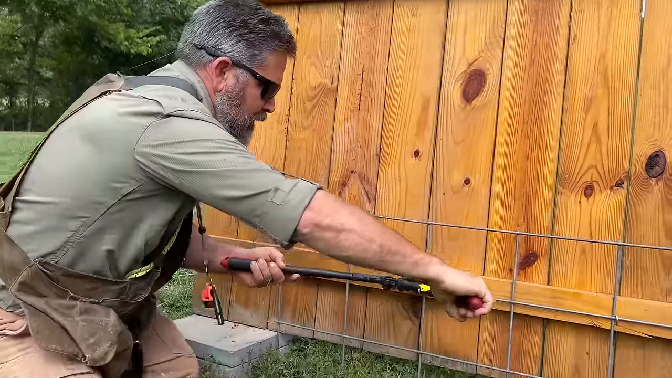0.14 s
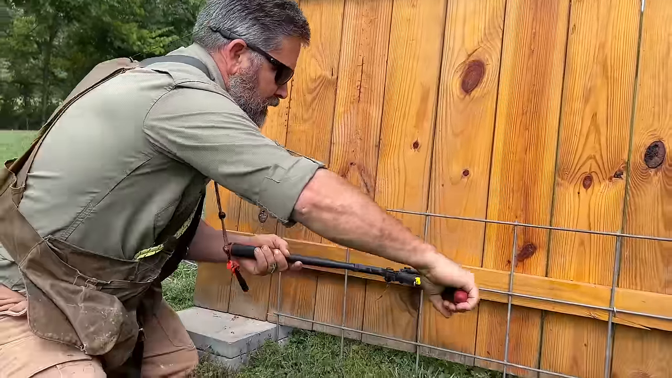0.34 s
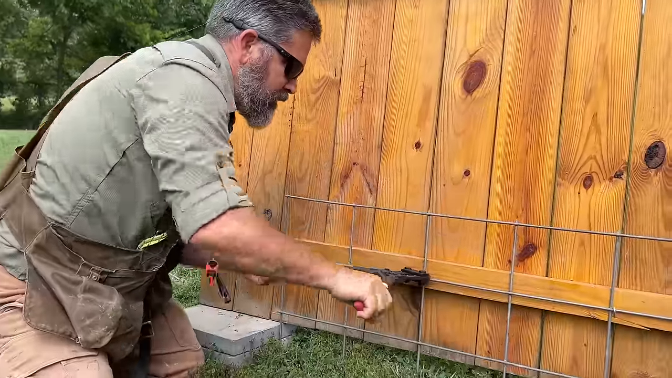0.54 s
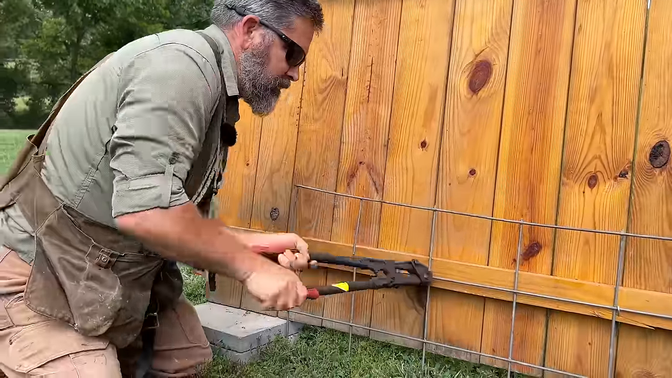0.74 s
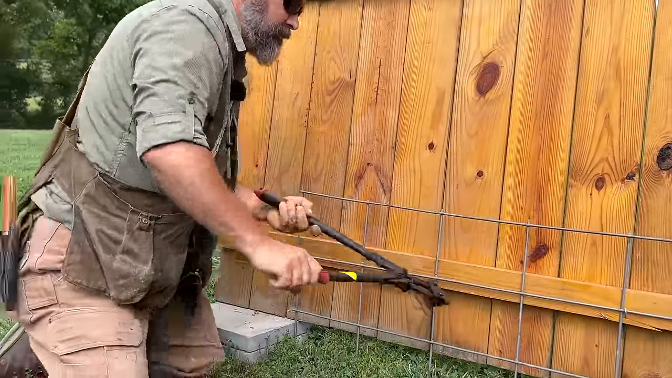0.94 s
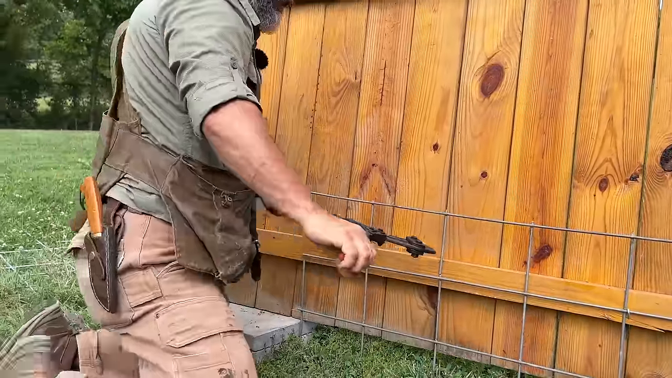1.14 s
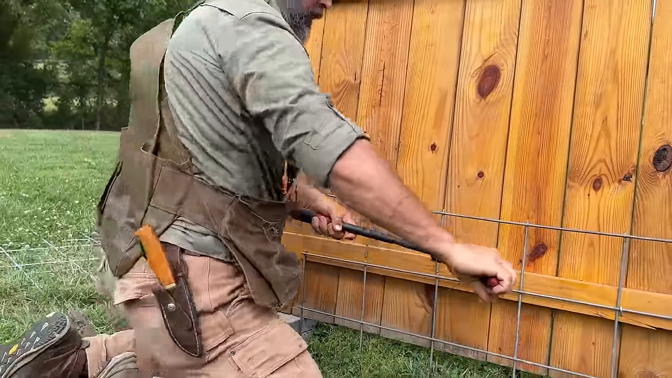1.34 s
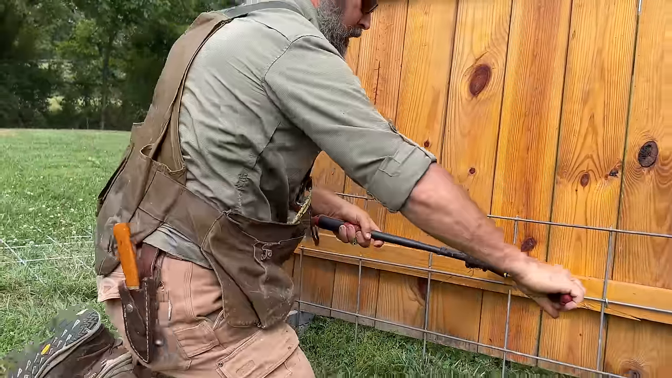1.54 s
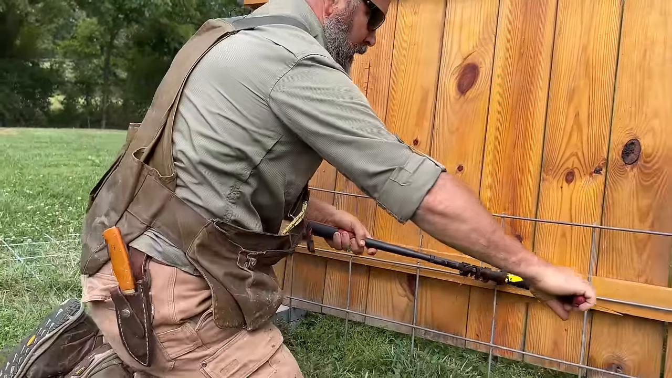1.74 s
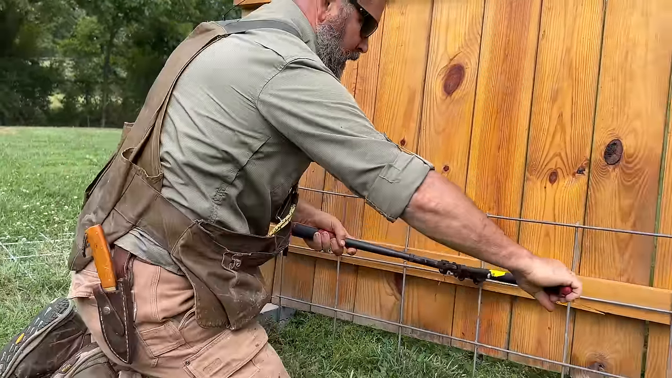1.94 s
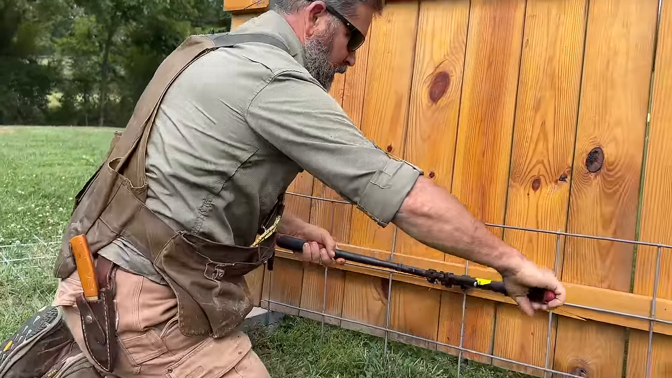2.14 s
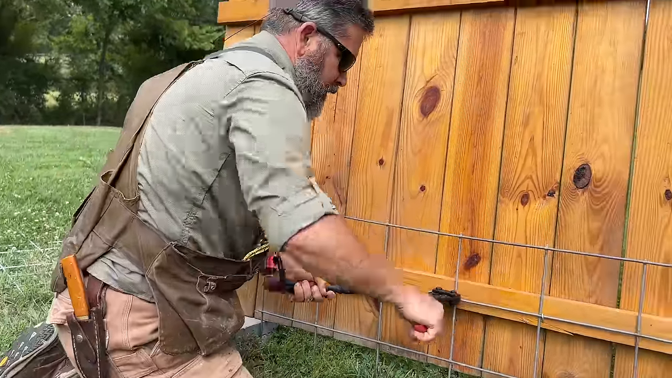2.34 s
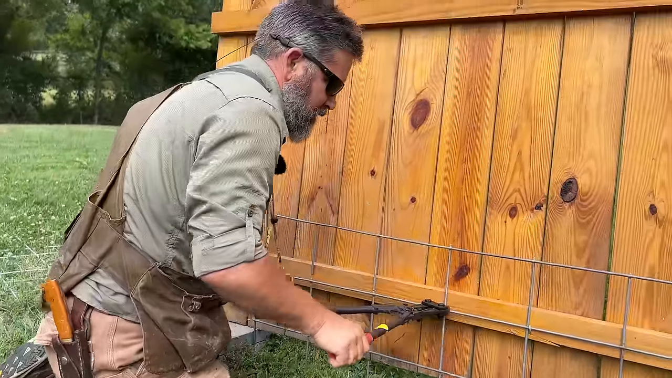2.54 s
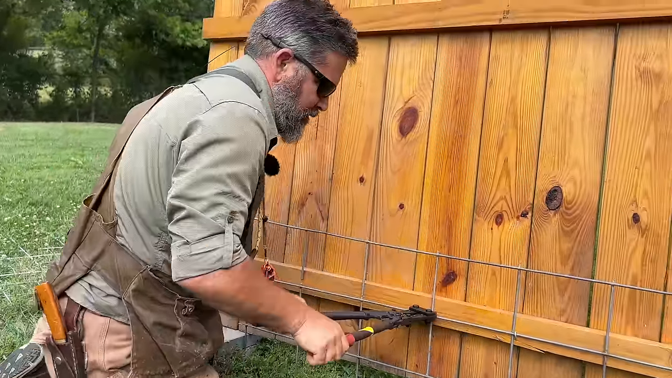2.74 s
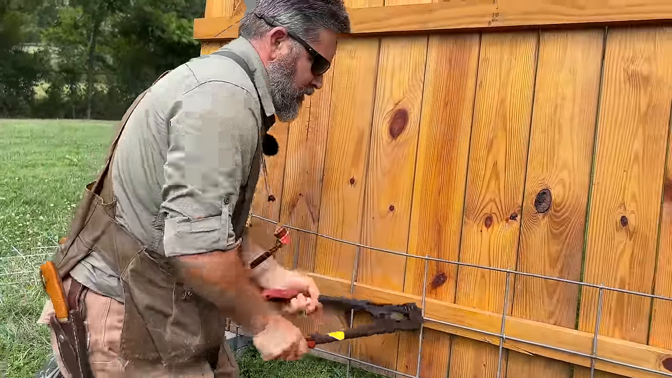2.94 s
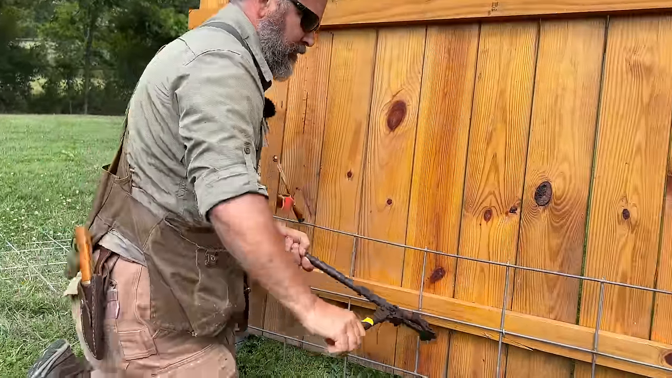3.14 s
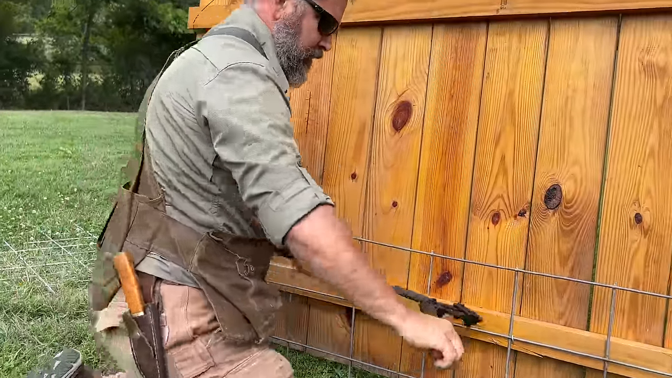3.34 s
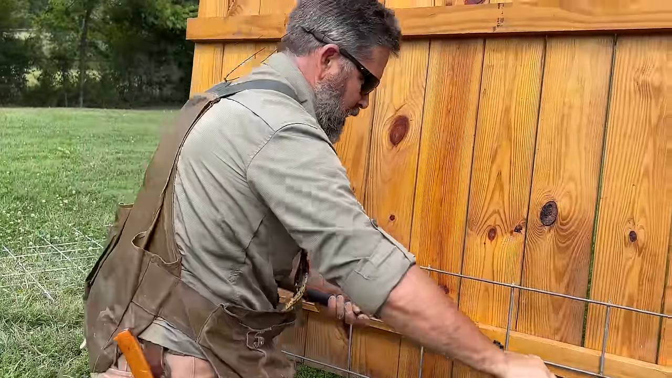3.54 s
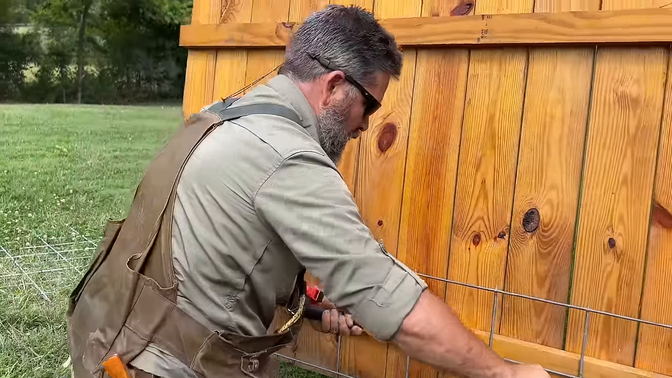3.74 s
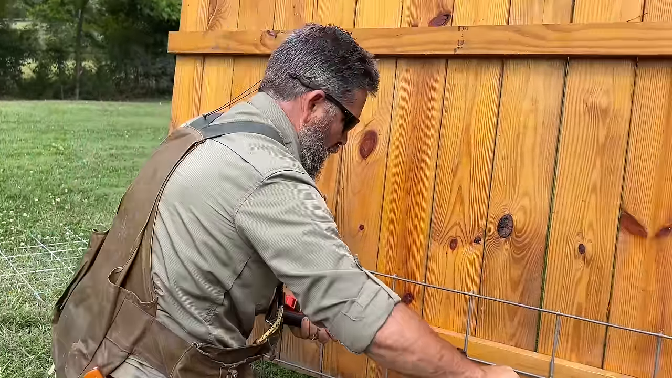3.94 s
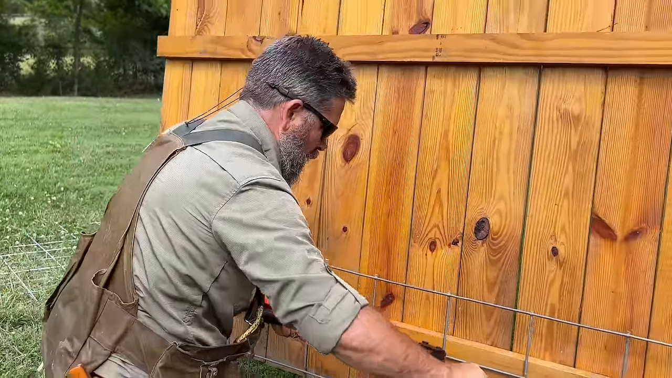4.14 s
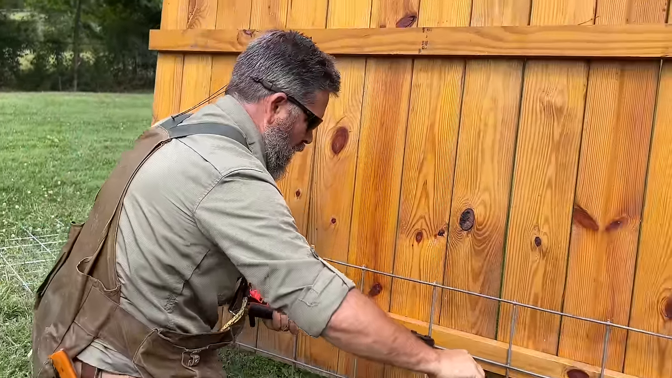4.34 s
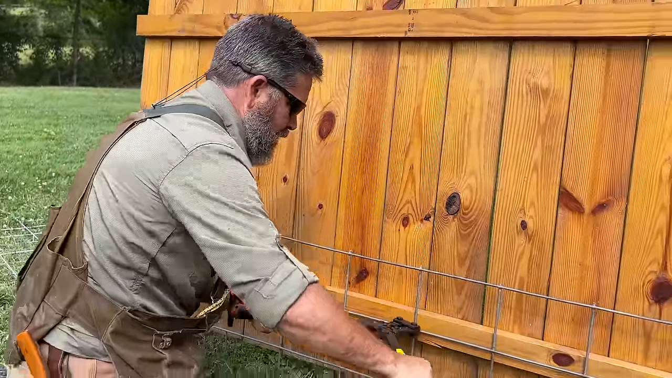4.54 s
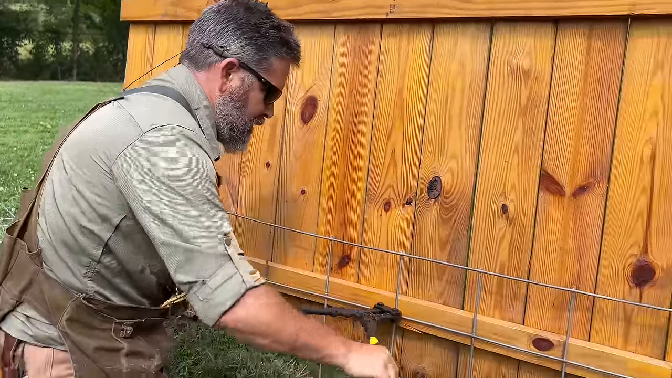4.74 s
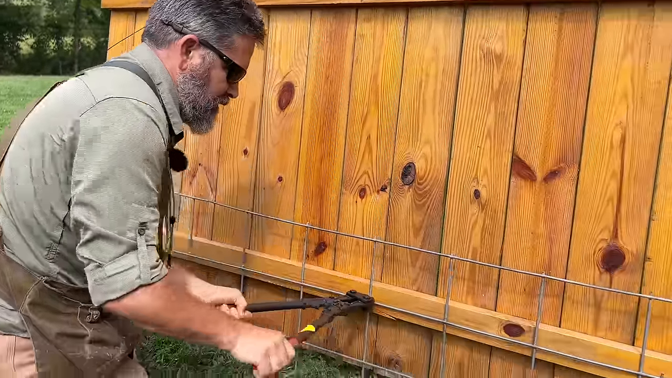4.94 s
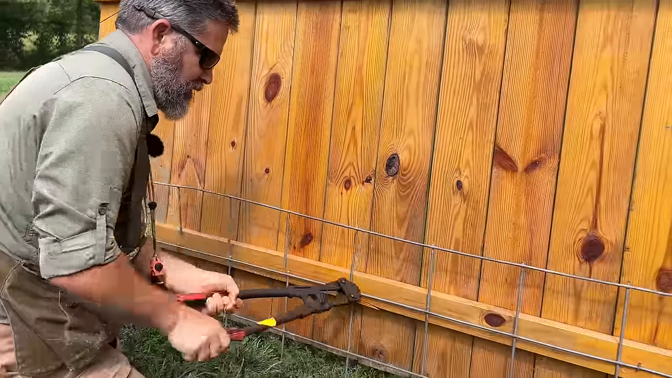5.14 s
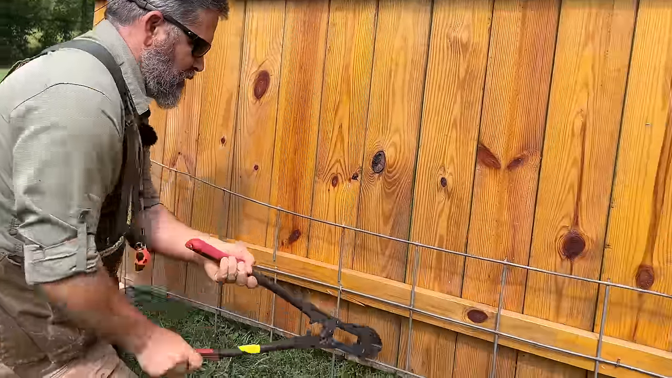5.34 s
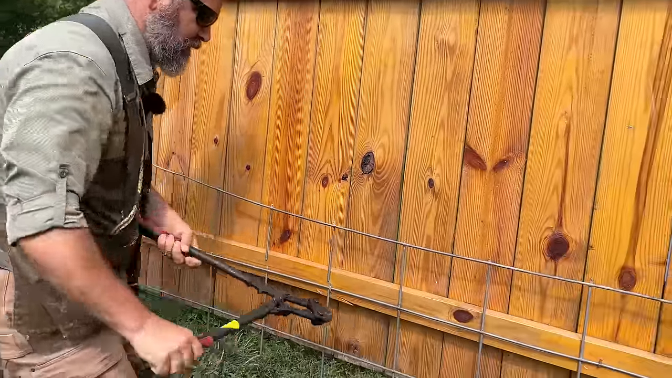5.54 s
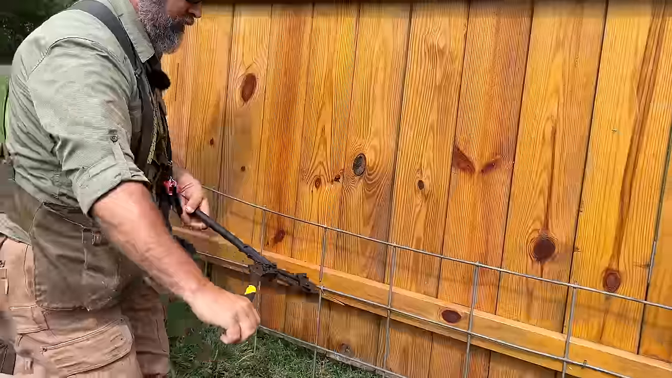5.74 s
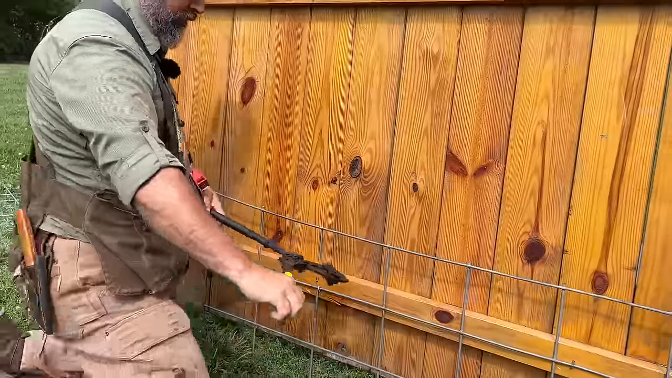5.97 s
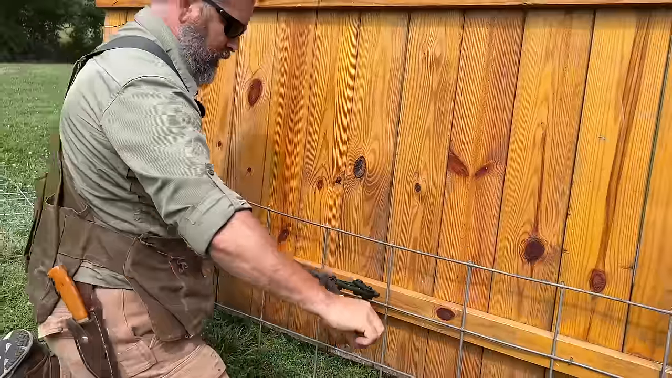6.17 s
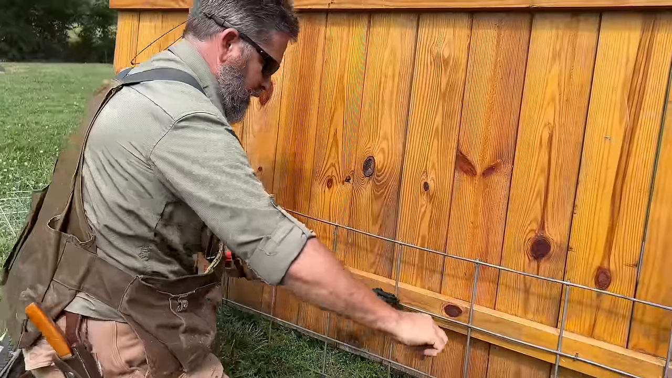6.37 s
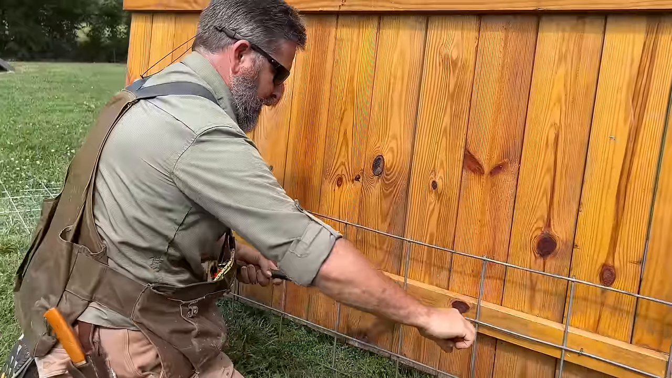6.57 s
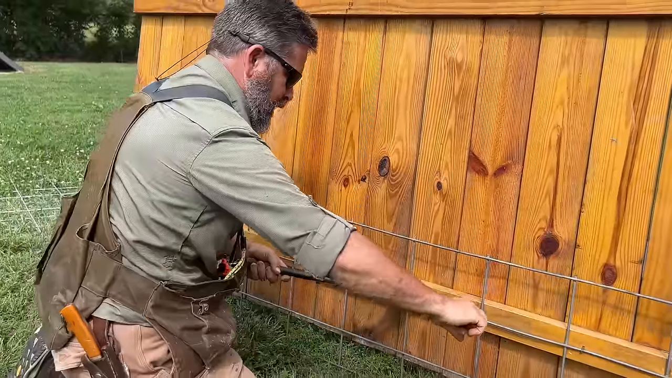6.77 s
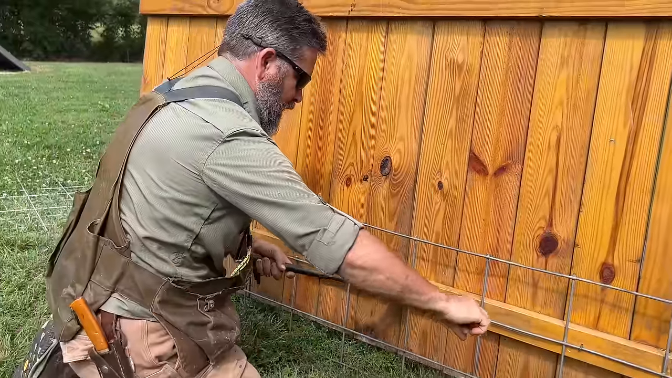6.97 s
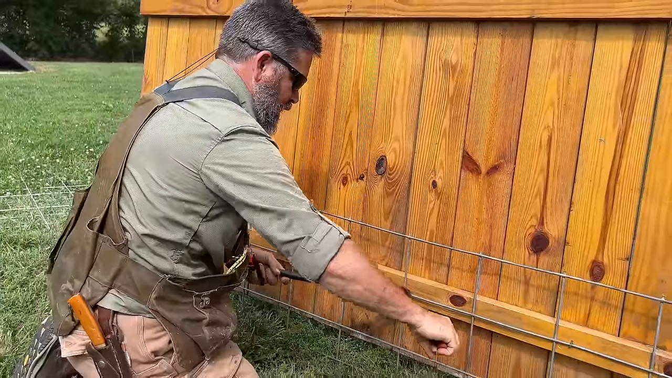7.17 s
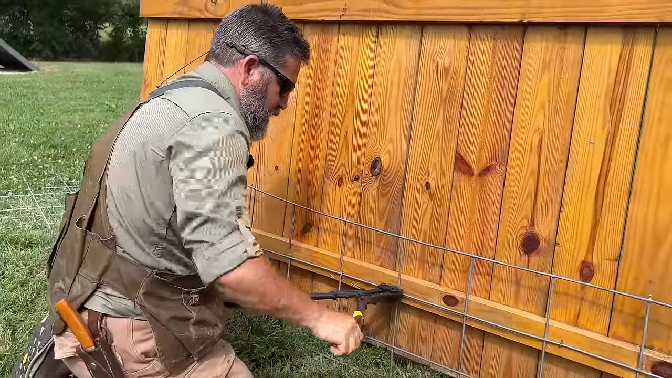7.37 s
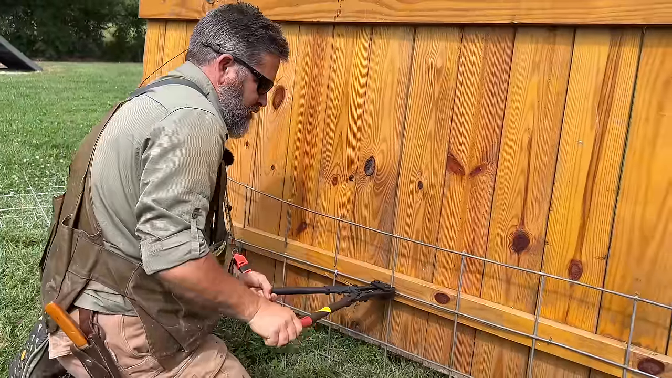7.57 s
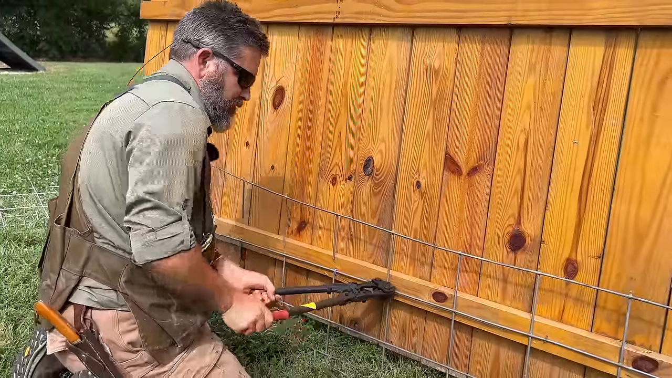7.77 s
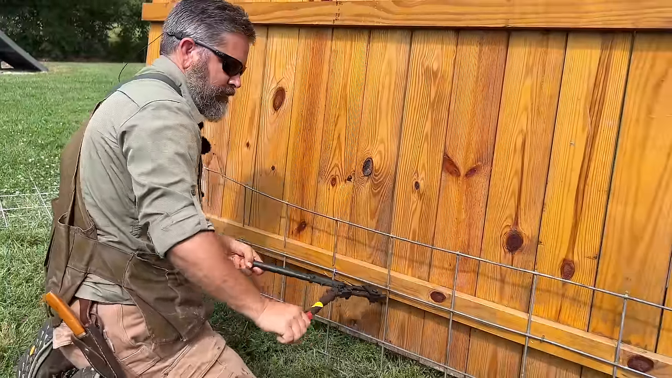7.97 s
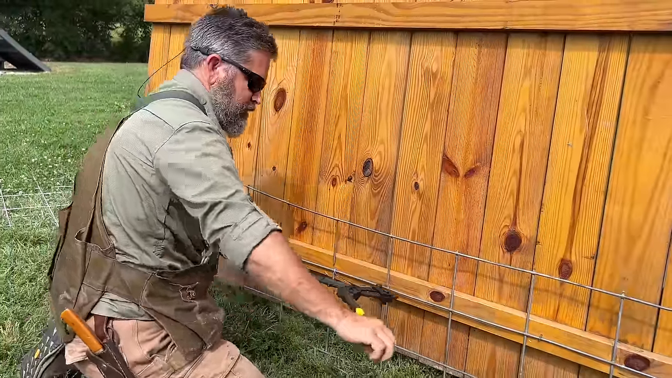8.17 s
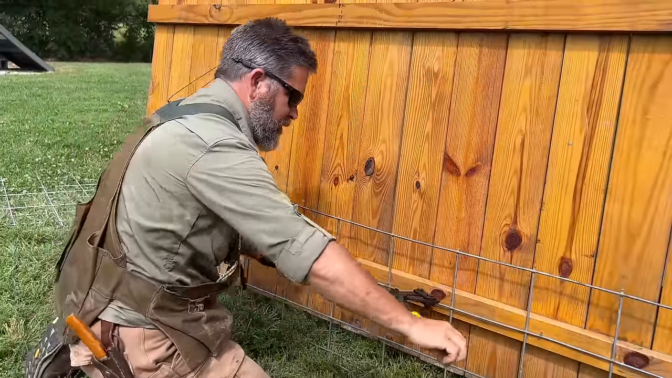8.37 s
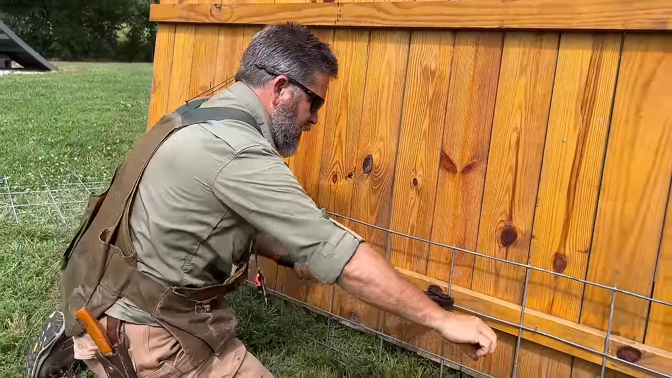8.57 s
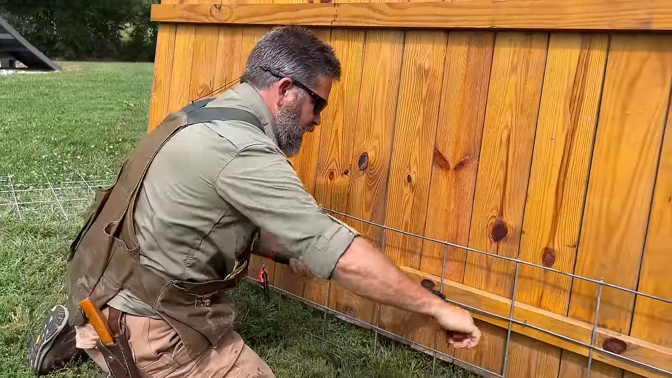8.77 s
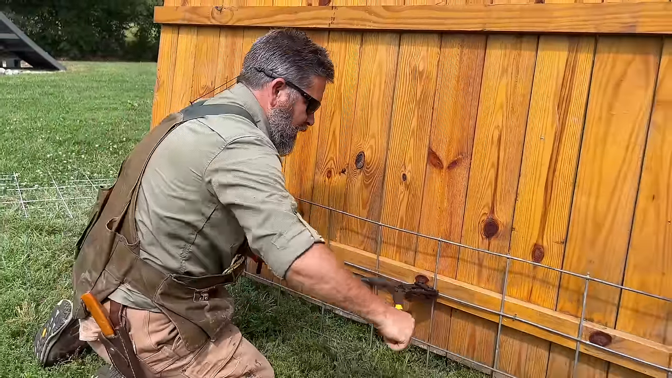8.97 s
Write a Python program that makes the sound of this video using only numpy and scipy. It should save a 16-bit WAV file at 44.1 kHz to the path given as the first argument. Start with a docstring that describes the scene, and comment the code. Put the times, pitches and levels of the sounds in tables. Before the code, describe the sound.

Four hard metallic snaps crack through a board fence, separated by light wire rattles and low bumps over faint engine hum and insects.

```python
"""Steel rattles against a board fence while a far engine hums and insects hiss over the field.
Bolt cutters then snap four wires of the leaning mesh panel, heard by a microphone on the chest.
Snaps and contacts are dying noise through boards, jaws and wire; a buzz of varying level joins them.
The steel rings as dying sines, a freed length of wire drops and rings, and low thumps bump the chest.
Peaks beyond full scale are clipped."""
import sys
import numpy as np
from scipy import signal
from scipy.io import wavfile
from scipy.ndimage import uniform_filter1d

SR = 44100
rng = np.random.default_rng(int(sys.argv[2]) if len(sys.argv) > 2 else 0)


def unload_audio(sound):
    """Save the sound as a 16-bit wav file, at the path given as the first command line argument."""
    columns = np.transpose(np.atleast_2d(sound))
    # keep every value between -1 and 1, then stretch to whole-number steps
    steps = np.round(np.clip(columns, -1, 1) * 32767)
    wavfile.write(sys.argv[1], SR, steps.astype(np.int16))


N = 397341

# The far engine's path. Each row: time in seconds, firing rate in Hz, level in dB.
ENGINE_HUM = [(0, 80.6, -55.5), (.6, 78, -56), (1.8, 75.7, -63.5), (3.3, 78.3, -59), (5.0, 78.5, -70.5),
              (6.2, 80.64, -67.5), (8.2, 73.95, -66.5), (9.01, 74.5, -63.5)]
# Modes of the cutters. Each row: frequency in Hz, relative level in dB, free t60 in seconds.
STEEL_MODES = [(2358, -6, .12), (2912, -5, .15), (3050, -6, .13), (3375, -6, .22), (3731, -2, .12),
               (3880, -5, .11), (4409, -10, .12), (5243, -12, .2), (5540, -5, .18), (6492, -4, .22),
               (7221, -6, .12), (7725, -10, .16), (8040, -7, .13), (9230, -10, .22), (10510, -9, .25),
               (11430, -12, .1), (12580, -8, .2)]
# The jaws bite through a wire. Each row: start in seconds, boards peak in dB, jaws in dB, wire in dB,
# knock in Hz, clear ring of the steel in dB, how long it rings as a share of each mode's t60.
WIRE_SNAPS = [(0.655, -3, -5.5, -7, 3300, -33, .8), (2.775, 2, -3.5, -4.5, 3860, -31, .8),
              (5.115, -1, -7, -6, 2750, -30, .9), (7.646, 1, -5.5, -4.5, 3270, -25, 1.7)]


def amp(db):
    """Turns dB into a linear gain."""
    return 10 ** (np.asarray(db) / 20)


def evened(x):
    """Scales to rms 1."""
    return x / np.sqrt(np.mean(x ** 2) + 1e-20)


def unit(x):
    """Scales a response to energy 1."""
    return x / np.linalg.norm(x)


def read(points, hz):
    """Reads a spectrum on a log-frequency axis."""
    f, value = np.transpose(points)
    return np.interp(np.log(hz + 1), np.log(f + 1), value)


def follow(rows):
    """Joins curve rows into one value a sample for each column."""
    s, *columns = np.transpose(rows)
    return [np.interp(np.arange(N) / SR, s, c) for c in columns]


def add(mix, s, sound):
    """Mixes a sound in at time s, cut off at the end of the mix."""
    part = mix[..., round(s * SR):][..., :sound.shape[-1]]
    part += sound[..., :part.shape[-1]]


def colour(points, size=4096):
    """Causal minimum-phase response with the given spectrum, at energy 1."""
    level_db = read(points, abs(np.fft.fftfreq(size, 1 / SR)))
    log_gain = np.log(amp(np.maximum(level_db, -100)))
    spectrum = np.exp(np.conj(signal.hilbert(log_gain)))  # the phase follows from the gain
    return unit(np.fft.ifft(spectrum).real[:size // 2])


def ring(modes, db=0, stretch=1):
    """Sum of dying sines, as a struck body rings in its modes."""
    t = np.arange(SR // 3) / SR
    hz, mode_db, t60 = np.transpose(modes)[:, :, None]
    decay = amp(mode_db + db - 60 * t / (t60 * stretch))
    return (decay * np.sin(2 * np.pi * hz * t)).sum(0)


def gritty(size, spread_db):
    """Noise of many tiny impacts of uneven strength."""
    uneven = evened(uniform_filter1d(rng.standard_normal(size), size=40))
    return evened(rng.standard_normal(size) * amp(spread_db * uneven))


def engine():
    """A far engine: its wavering firing tone and the octave."""
    octave_db = -7.5
    hz, db = follow(ENGINE_HUM)
    waver = evened(uniform_filter1d(rng.standard_normal((2, N)), size=4000))
    turn = 2 * np.pi * np.cumsum(hz + 3.2 * waver[0]) / SR
    level = np.sqrt(2) * amp(db + 1.2 * waver[1])
    return level * (np.sin(turn) + amp(octave_db) * np.sin(2 * turn))


def field():
    """Soft outdoor air and insects: shaped noise whose spectrum drifts in patches."""
    # Spectrum of the air. Each row: frequency in Hz, relative density in dB per Hz.
    air_spectrum = [(12, -50.5), (20, -20.5), (81, -3.5), (271, -13.5), (391, -16.5), (906, -23.5),
                    (1680, -34.5), (3480, -35), (4740, -32.5), (7850, -31), (14600, -45.5), (16300, -63)]
    field_db = -59
    field_follows = 0.61  # the air quiets with the engine, dB per dB
    insect_hz, width_hz, insect_db = 7750, 450, 4  # the insects are a bump in the spectrum

    frames, hz = N // 256 + 5, np.fft.rfftfreq(1024, 1 / SR)
    real, imaginary, patches = rng.standard_normal((frames, 513, 3)).T
    patches = uniform_filter1d(patches, size=12, axis=0)  # across frequency
    patches = evened(uniform_filter1d(patches, size=14, axis=1))  # across time
    insect_bump_db = insect_db * np.exp(-((hz - insect_hz) / width_hz) ** 2)
    level_db = read(air_spectrum, hz) + insect_bump_db
    z = (real + 1j * imaginary) * amp(level_db[:, None] + 0.61 * patches)
    air = evened(signal.istft(z, nperseg=1024, noverlap=768)[1][:N])
    hum_db = follow(ENGINE_HUM)[1]
    return amp(field_db + field_follows * (hum_db - hum_db.mean())) * air


def thumps():
    """Handles and arms bump the chest near the microphone: a low tone whose pitch drops at once."""
    # Bumps on the chest. Each row: start in seconds, peak in dB.
    chest_bumps = [(0.072, -19.5), (0.115, -29), (0.169, -34.5), (0.655, -22.5), (0.739, -31),
                   (1.971, -17.5), (2.005, -30.5), (2.235, -33), (2.311, -25.5), (2.787, -27.5),
                   (3.014, -34.5), (3.12, -45), (3.453, -31.5), (3.684, -35), (4.185, -27), (4.508, -38.5),
                   (5.115, -13.5), (5.164, -26), (6.94, -27), (7.258, -36.5), (7.478, -45), (7.646, -19.5),
                   (7.821, -33), (8.568, -23), (8.67, -33), (8.986, -38.5)]
    out, t = np.zeros(N), np.arange(SR // 8) / SR
    turn = 2 * np.pi * 135 * t * (1 + .9 * np.exp(-t / 0.0078))
    thump = amp(-60 * t / 0.05) * np.sin(turn)
    for s, db in chest_bumps:
        add(out, s, amp(db) * thump / abs(thump).max())
    return out


def offcut():
    """The freed length of wire drops; each bounce rings its modes in another balance."""
    # Modes of the loose wire. Each row: frequency in Hz, relative level in dB, t60 in seconds.
    loose_modes = [(5660, -4, .2), (6400, -4, .15), (8960, 0, .28), (9350, -2, .28), (10900, -2, .15),
                   (12600, -8, .25), (15160, -14, .18)]
    # Its bounces. Each row: start in seconds, level in dB.
    bounces = [(5.243, -34), (5.304, -42), (5.524, -65)]
    out = np.zeros(N)
    spots_db = 2.9 * rng.standard_normal((len(bounces), len(loose_modes), 1))
    for (s, db), spot_db in zip(bounces, spots_db):
        add(out, s, ring(loose_modes, db=db + spot_db))
    return out


def snap_rings():
    """Each snap sets steel and cut strand ringing freely, every mode a little stronger or weaker."""
    # The cut strand of the panel hums. Each row: frequency in Hz, relative level in dB,
    # t60 in seconds before the snap's share.
    strand_modes = [(1575, 4.5, 0.2), (955, 2.5, .25), (620, 3.5, 0.22)]
    modes = STEEL_MODES + strand_modes
    out = np.zeros(N)
    spots_db = 2.5 * rng.standard_normal((len(WIRE_SNAPS), len(modes), 1))
    for (s, *_, db, share), spot_db in zip(WIRE_SNAPS, spots_db):
        add(out, s, ring(modes, db=db + spot_db, stretch=share))
    return out


def knock(hz, width, noise):
    """Noise in the one resonance that a contact favours."""
    r = np.exp(-np.pi * width / SR)
    resonance = [1, -2 * r * np.cos(2 * np.pi * hz / SR), r * r]
    return evened(signal.lfilter([1, 0, -1], resonance, noise))


def fading(boards_t60, steel_t60):
    """Shaking of boards, jaws, wire and ring: a quick start, a fall, and a faint longer tremble."""
    jolt_t60 = .02  # the jolt that rings the tool is brief (s)
    boards_tremble_db, steel_tremble_db = -17, -18
    t = np.arange(SR // 3) / SR
    t60 = np.maximum([boards_t60, steel_t60, steel_t60, jolt_t60], .004)[:, None]
    rise = 1 - np.exp(-t / np.array([[.003], [.0003], [.0003], [.002]]))  # boards start later than steel
    tremble_db = np.repeat([boards_tremble_db, steel_tremble_db], [1, 3])[:, None]
    return rise * (amp(-60 * t / t60) + amp(tremble_db - 60 * t / (3.1 * t60)))


def contacts():
    """Each snap or contact is a dying rattle that drives boards, jaws, wire and the ring of the tool."""
    # Tool, wire and fence touch. Each row: start in seconds, boards peak in dB, jaws in dB, wire in dB,
    # knock in Hz, knock above jaws in dB, t60 of boards rattling and of steel rattling in seconds.
    touches = [(0.052, -25.5, -48.5, -64, 2140, 2, 0.17, 0.079),
               (0.117, -35, -47.5, -76, 1570, 1, 0.18, 0.049), (0.171, -41, -45, -71, 1550, 4, 0.15, 0.033),
               (0.195, -42.5, -47, -56, 2970, 0, 0.26, 0.026),
               (0.333, -42, -47, -47.5, 4630, 5, 0.043, 0.028),
               (0.369, -38.5, -58, -53.5, 2910, 3, 0.15, 0.12),
               (0.738, -17, -24.5, -21, 3660, -0.5, 0.18, 0.06),
               (0.787, -29, -35, -69, 1580, 3, 0.1, 0.027), (0.846, -37, -47, -61, 1640, 3, 0.1, 0.04),
               (0.866, -40, -46.5, -58, 2000, 4, 0.12, 0.049),
               (1.006, -37.5, -80.5, -85, 1720, 3, 0.11, 0.03),
               (1.511, -29.5, -47, -46.5, 1466, 4.5, 0.13, 0.048),
               (1.581, -36, -51, -49, 2980, 10.5, 0.29, 0.051),
               (1.676, -23.5, -39, -38, 2030, 1.5, 0.11, 0.023),
               (1.883, -43, -52, -51.5, 1900, 1.5, 0.18, 0.024),
               (1.899, -28.5, -40.5, -55, 1790, -5, 0.1, 0.038),
               (1.97, -27.5, -45.5, -51, 1590, -9, 0.077, 0.035),
               (2.007, -26.5, -44, -67, 1580, 0, 0.1, 0.03), (2.076, -44, -51, -61, 5650, 9, 0.13, 0.017),
               (2.092, -28.5, -37, -44, 1860, -4.5, 0.12, 0.037),
               (2.169, -37, -59, -57, 1610, 10, 0.072, 0.03),
               (2.2, -36.5, -47.5, -43.5, 3470, 2, 0.073, 0.036),
               (2.234, -34, -59, -57, 1580, -1, 0.082, 0.062),
               (2.607, -46, -46, -34.5, 2780, 3, 0.068, 0.036),
               (2.733, -49.5, -49, -59, 3170, -12, 0.18, 0.051),
               (2.959, -30, -47, -37.5, 2900, 4, 0.089, 0.028),
               (2.977, -46, -42.5, -35, 5600, 2, 0.1, 0.04), (3.017, -24, -49.5, -59, 1640, 6, 0.088, 0.05),
               (3.119, -32.5, -51.5, -70, 1950, 7.5, 0.23, 0.061),
               (3.225, -45.5, -44.5, -39, 5500, 0, 0.11, 0.045),
               (3.33, -48, -50, -49.5, 2900, 0, 0.072, 0.04),
               (3.353, -65.5, -57.5, -45, 2870, 7.5, 0.09, 0.069),
               (3.399, -45, -56.5, -65, 2720, 1, 0.048, 0.034),
               (3.481, -19.5, -41, -53, 1940, -6.5, 0.071, 0.036),
               (3.56, -38, -55, -38, 5470, 0, 0.11, 0.025), (3.6, -23, -49, -52, 1600, 3, 0.057, 0.025),
               (3.635, -32, -31, -34.5, 3180, -2.5, 0.052, 0.022),
               (3.663, -46, -52, -64, 2750, 2.5, 0.12, 0.029),
               (3.683, -20.5, -49, -39.5, 1850, 6, 0.056, 0.033),
               (4.107, -28, -62, -66.5, 1700, 2, 0.084, 0.025),
               (4.184, -29.5, -60.5, -59.5, 3200, 3.5, 0.11, 0.04),
               (4.428, -34.5, -43, -45, 2720, 1.5, 0.1, 0.032),
               (4.598, -32.5, -44, -38.5, 2000, 0, 0.067, 0.027),
               (4.619, -41, -54.5, -54, 2400, 2, 0.19, 0.048),
               (4.652, -43, -55.5, -54, 2500, 1, 0.11, 0.04),
               (4.828, -33.5, -46, -40.5, 1975, -1.5, 0.11, 0.066),
               (4.95, -37, -50, -45, 1970, 4.5, 0.12, 0.032),
               (4.98, -45, -56.5, -46.5, 3350, 4, 0.051, 0.04), (5.166, -16, -22, -26, 1750, -6, 0.3, 0.12),
               (5.236, -11.5, -26, -29, 3300, 2, 0.12, 0.12), (5.282, -16, -29, -51, 1640, 5, 0.13, 0.061),
               (5.301, -25, -32, -40, 1810, 12, 0.19, 0.079), (5.354, -52, -46, -49, 2870, 8, 0.066, 0.028),
               (5.385, -36, -65, -52, 1740, 3, 0.051, 0.036),
               (5.404, -23.5, -34, -44, 1510, 3.5, 0.12, 0.065),
               (5.457, -60, -69, -57, 1520, -2, 0.14, 0.027), (5.486, -44, -56, -54, 1540, 3, 0.12, 0.045),
               (5.52, -27, -33, -46, 1790, 2.5, 0.14, 0.066),
               (5.577, -26.5, -51, -75, 1500, 8, 0.051, 0.044),
               (5.601, -34, -53, -66, 1880, 9.5, 0.3, 0.12),
               (5.656, -65, -54, -61, 1530, 3.5, 0.088, 0.045),
               (5.713, -48, -54.5, -55, 1875, 6, 0.064, 0.035),
               (5.732, -43, -48.5, -49.5, 1540, 0, 0.12, 0.05),
               (5.743, -46, -50.5, -43, 5500, 2.5, 0.037, 0.028),
               (5.81, -42.5, -60, -48, 5460, 1, 0.081, 0.042),
               (5.825, -50, -52.5, -58.5, 3140, 3, 0.068, 0.031),
               (5.936, -54, -57.5, -54, 3090, 3.5, 0.1, 0.05),
               (6.322, -23.5, -47, -51, 2930, -2, 0.11, 0.069),
               (6.365, -43, -57, -50, 3550, 1, 0.22, 0.047),
               (6.403, -25.5, -45, -51.5, 3030, -0.5, 0.086, 0.073),
               (6.45, -53.5, -58, -51.5, 5550, 10, 0.11, 0.036),
               (6.882, -25.5, -49, -65, 1740, 3, 0.14, 0.04),
               (6.94, -32.5, -43, -62, 4900, 7, 0.049, 0.018),
               (6.962, -39, -46.5, -58, 2270, 3, 0.073, 0.023),
               (6.987, -33.5, -43, -47.5, 3180, -3.5, 0.21, 0.063),
               (7.215, -40.5, -42.5, -39.5, 2330, 2.5, 0.078, 0.03),
               (7.238, -39, -54.5, -53, 3760, 1, 0.054, 0.04),
               (7.26, -36.5, -59.5, -48, 2760, 1, 0.11, 0.042),
               (7.371, -40, -52.5, -52, 2550, 2.5, 0.069, 0.028),
               (7.424, -48.5, -52.5, -49.5, 2910, 2.5, 0.15, 0.025),
               (7.498, -64, -61.5, -51.5, 2500, 3, 0.037, 0.04),
               (7.591, -43, -57, -74, 1580, 2.5, 0.11, 0.045), (7.819, -22, -32, -53, 1740, 3, 0.1, 0.088),
               (7.855, -54, -53, -50, 1730, -4, 0.048, 0.033),
               (7.951, -32, -42.5, -54, 1830, 5, 0.1, 0.055),
               (7.961, -8.5, -38, -45, 1800, -3, 0.066, 0.048),
               (7.999, -12, -31, -43, 1840, -4.5, 0.11, 0.095),
               (8.02, -17, -36.5, -35, 1820, -3, 0.082, 0.11), (8.056, -29, -36, -48, 1880, 0, 0.09, 0.11),
               (8.119, -30.5, -42.5, -41.5, 1940, 6, 0.13, 0.045),
               (8.163, -39, -50, -68, 1760, 9, 0.19, 0.052),
               (8.227, -36.5, -51.5, -69, 1560, 8.5, 0.14, 0.049),
               (8.272, -38.5, -50, -71.5, 1560, 5, 0.23, 0.055),
               (8.529, -28.5, -51.5, -64, 1520, 3, 0.24, 0.04),
               (8.566, -31, -40.5, -42.5, 2700, 3, 0.077, 0.03),
               (8.654, -36, -59, -62.5, 1620, 0, 0.033, 0.04),
               (8.672, -18.5, -34, -38, 3030, 0.5, 0.086, 0.042),
               (8.986, -35, -47, -38.5, 4480, 3, 0.079, 0.021)]
    snap_knock_db = -2  # knock of a snap against its jaws
    snap_boards_t60, snap_steel_t60 = 0.17, 0.076  # s
    ring_db = -17  # drive of the tool's ring against the jaws
    crest_db = 8  # the boards peak this far above their steady shaking

    drive, direct = np.zeros((4, N)), np.zeros(N)
    hits = [(*row[:5], snap_knock_db, snap_boards_t60, snap_steel_t60) for row in WIRE_SNAPS]
    hits += touches
    noises = rng.standard_normal((len(hits), SR // 3))
    for hit, noise in zip(hits, noises):
        s, boards_db, jaws_db, wire_db, hz, knock_db, boards_t60, steel_t60 = hit
        shake = fading(boards_t60, steel_t60)
        levels_db = [[boards_db - crest_db], [jaws_db], [wire_db], [jaws_db + ring_db]]
        add(drive, s, amp(levels_db) * shake)
        add(direct, s, amp(jaws_db + knock_db) * shake[1] * knock(hz, 170, noise))
    return drive, direct


def panel():
    """Contacts and the panel's buzz sound through the boards, the jaws, the wire and the steel modes."""
    # Panel buzzing on the fence. Each row: time in seconds, boards in dB, jaws in dB.
    buzz_curve = [(0, -40, -52.5), (.1, -66, -83), (.43, -60, -59.5), (.85, -49.5, -58.5),
                  (1.1, -62.5, -74), (1.55, -51.5, -59.5), (1.76, -51, -62), (1.9, -83.5, -89),
                  (2.3, -51, -60), (2.76, -77.5, -69), (3.06, -47, -66.5), (3.3, -56, -64.5),
                  (3.64, -56.5, -65), (3.8, -77, -86.5), (4.1, -59.5, -73), (5.1, -66.5, -71),
                  (5.28, -46.5, -49.5), (5.55, -49, -64.5), (5.7, -68, -73), (6.32, -59, -64.5),
                  (6.8, -77, -89.5), (7.2, -53.5, -66.5), (7.63, -68, -73), (7.8, -49.5, -44),
                  (7.93, -38.5, -50), (8.11, -33.5, -43.5), (8.28, -52, -60), (8.4, -71, -85),
                  (8.71, -54.5, -57), (9.01, -63, -67)]
    # Clear modes of the boards. Each row: frequency in Hz, width in Hz, relative level in dB.
    board_modes = [(382.3, 15, -4.5), (532.6, 18, 0), (611, 34, -1.5), (732, 60, -3), (795, 80, 7),
                   (898, 69, -2), (1064, 15, -9.5), (1169, 29, -5), (1302.7, 81, -6), (1560, 28, -11.5),
                   (1758, 24, -9), (1890, 40, -8.5)]
    # Dense small modes of the fence. Each row: frequency in Hz, relative density in dB per Hz.
    wood_spectrum = [(120, -46.5), (200, -17.5), (297, -26.5), (373, -4), (450, -11.5), (648, -6.5),
                     (913, -12.5), (2400, -22.5), (3120, -53.5), (5280, -120)]
    # Colour of the jaws. Each row: frequency in Hz, relative density in dB per Hz.
    jaws_spectrum = [(1000, -34), (1700, -5), (1980, -11.5), (2240, -4), (2660, -3), (2960, -5),
                     (3900, -5.5), (4800, 0), (6240, -37.5), (10600, -120)]
    # Colour of the wire. Each row: frequency in Hz, relative density in dB per Hz.
    wire_spectrum = [(2650, -29), (4500, -5.5), (7110, -4.5), (10900, -7.5), (11800, -13), (12800, -13.5),
                     (15100, -21.5), (16300, -36)]
    buzz_wire_db, buzz_ring_db = -9, -30  # against the jaws
    board_modes_db = 1.5  # clear board modes over the dense small ones

    drive, direct = contacts()
    boards_db, jaws_db = follow(buzz_curve)
    buzz = amp([boards_db, jaws_db, jaws_db + buzz_wire_db, jaws_db + buzz_ring_db])

    # a mode's width sets its t60
    clear = ring([(hz, db, np.log(1000) / (np.pi * width)) for hz, width, db in board_modes])
    dense = colour(wood_spectrum, size=len(clear) * 2)
    boards = unit(amp(board_modes_db) * unit(clear) + dense)
    clink = unit(ring(STEEL_MODES, stretch=.12))  # held in the hands, the steel clinks briefly
    clink += amp(3) * signal.unit_impulse(len(clink))  # the direct hit
    jaws = unit(signal.oaconvolve(clink, colour(jaws_spectrum)))
    wire = unit(signal.oaconvolve(clink, colour(wire_spectrum)))
    bodies = boards, jaws, wire, unit(ring(STEEL_MODES))

    grit = [gritty(N, spread_db=db) for db in (1.1, 7.3, 1.0, 4.8)]
    shaken = np.hypot(drive, buzz) * grit
    return direct + sum(signal.oaconvolve(force, body)[:N] for force, body in zip(shaken, bodies))


def scene():
    """Panel, steel rings, chest thumps, loose wire, field and engine on one channel."""
    return (panel() + snap_rings() + thumps() + offcut() + field() + engine())[None]


def record(dry):
    """Peaks clip at full scale; then a steep low-pass limits the band."""
    edge_hz = 16350
    clipped = np.clip(dry, -1, 1)
    low_pass = signal.firwin(511, edge_hz, window=("kaiser", 9), fs=SR)
    return signal.oaconvolve(clipped, low_pass[None], "same")


dry = scene()
out = record(dry)
unload_audio(out)
```